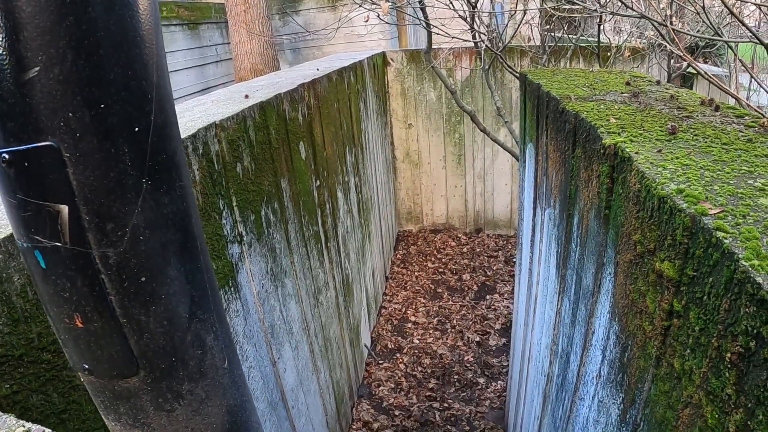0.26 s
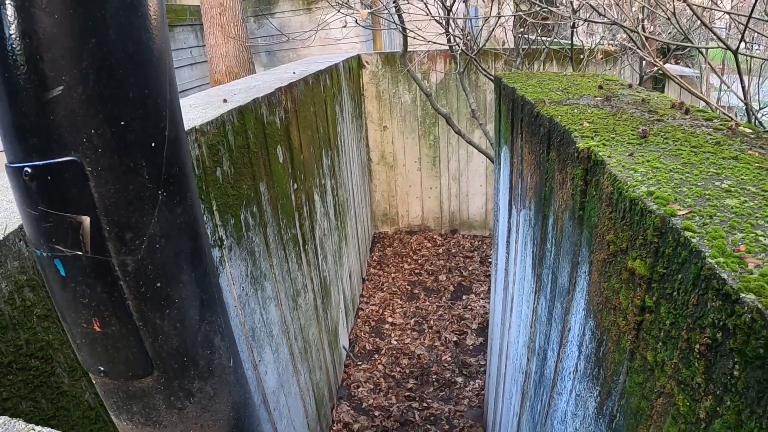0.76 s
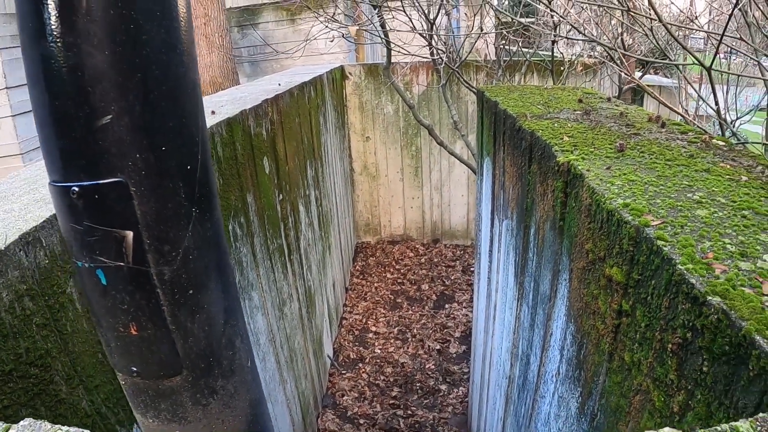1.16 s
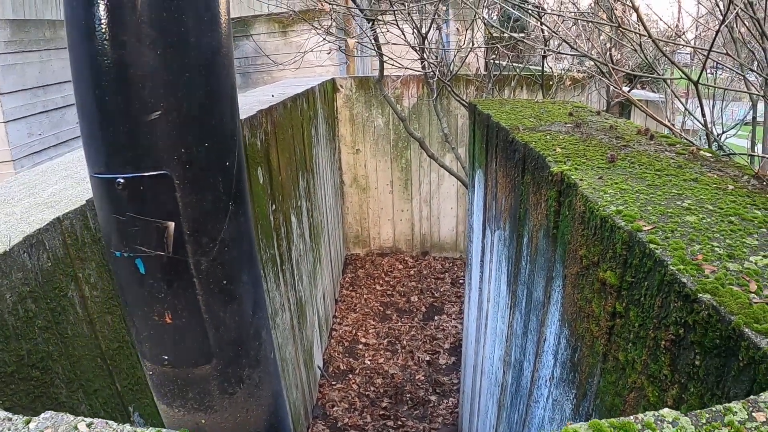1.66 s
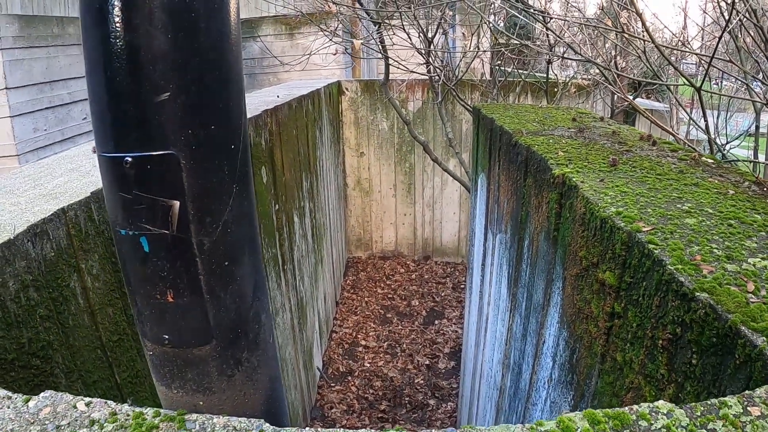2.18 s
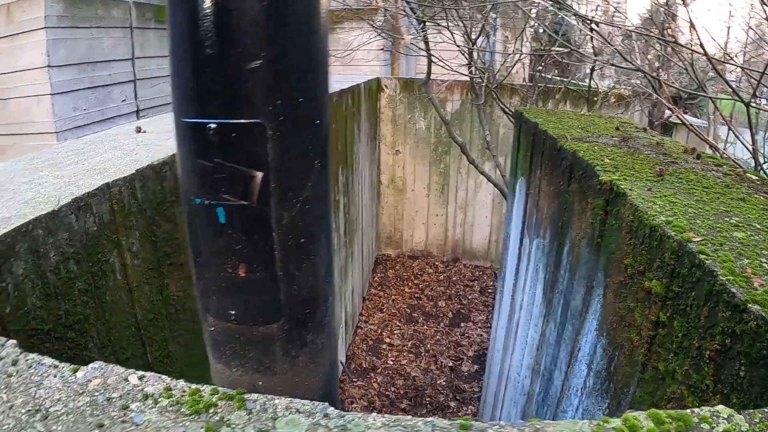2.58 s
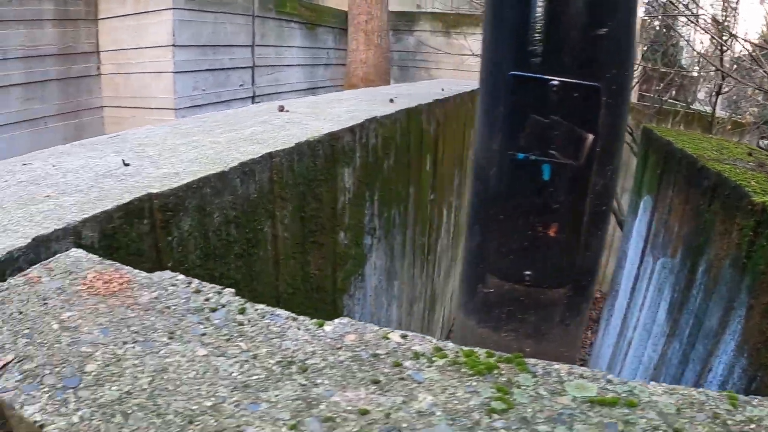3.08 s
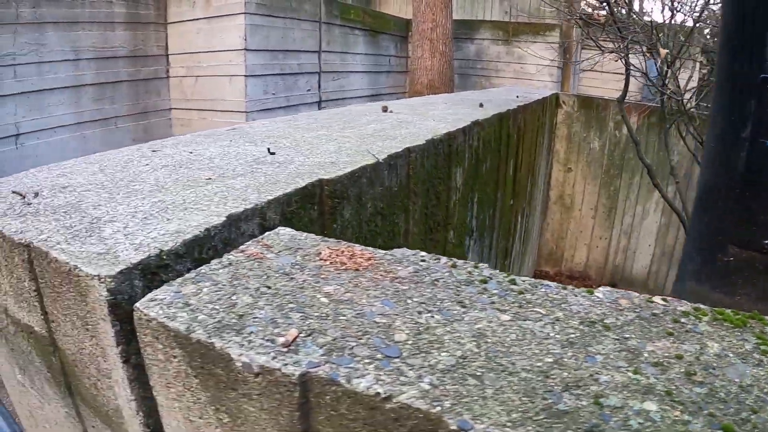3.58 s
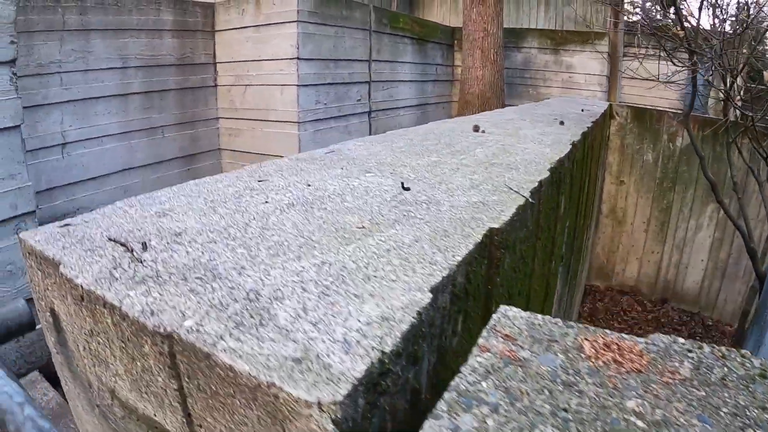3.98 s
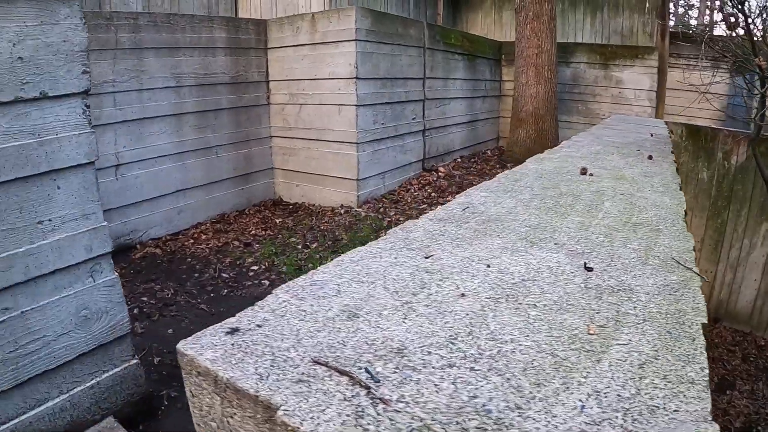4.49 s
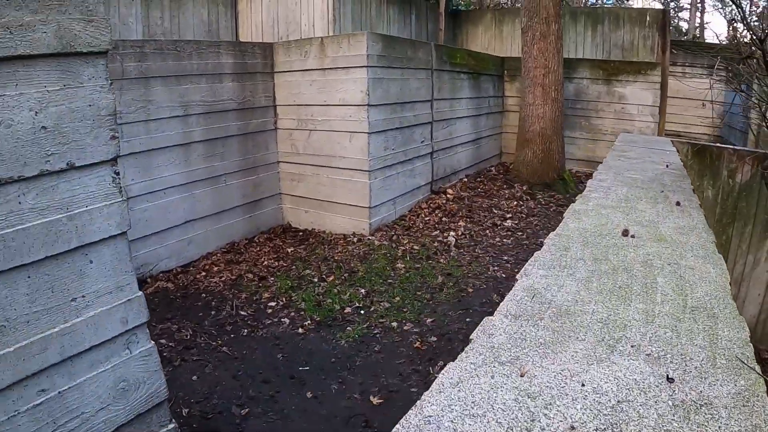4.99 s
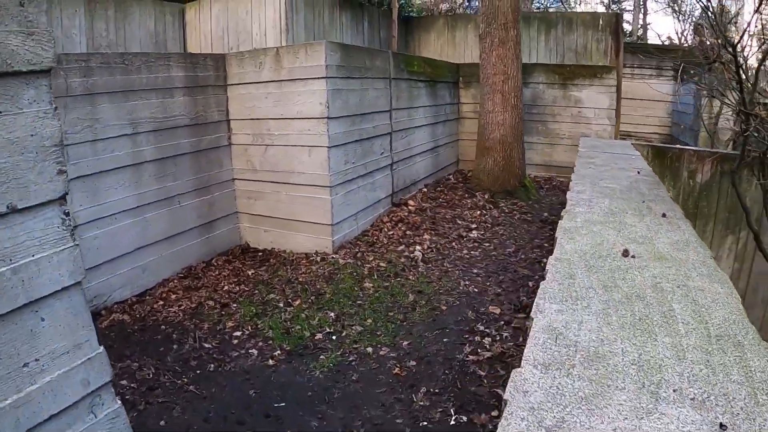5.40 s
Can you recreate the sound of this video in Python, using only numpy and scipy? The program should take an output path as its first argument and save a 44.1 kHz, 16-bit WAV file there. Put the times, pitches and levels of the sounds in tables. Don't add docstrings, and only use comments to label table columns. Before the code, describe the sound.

Deep, steady traffic rumble pulses between concrete walls while birds chirp right then left, and the handheld camera ticks and knocks.

```python
import sys
import numpy as np
from scipy import signal
from scipy.fft import rfft, irfft
from scipy.io import wavfile
from scipy.ndimage import uniform_filter1d

SR = 44100
rng = np.random.default_rng(int(sys.argv[2]) if len(sys.argv) > 2 else 0)


def unload_audio(sound):
    columns = np.transpose(np.atleast_2d(sound))
    steps = np.round(np.clip(columns, -1, 1) * 32767)
    wavfile.write(sys.argv[1], SR, steps.astype(np.int16))


def voltage_ratio(level):
    return 10 ** (np.asarray(level, float) / 20)


N = 249165
T = np.arange(N) / SR
F = np.maximum(np.fft.rfftfreq(N, 1 / SR), 1)


def curve(table):
    s, *columns = np.transpose(table)
    return [np.interp(T, s, column) for column in columns]


def walk(rate):
    hold = max(int(SR / rate), 2)
    steps = np.repeat(rng.standard_normal(N // hold + 1), hold)
    smooth = uniform_filter1d(uniform_filter1d(steps, hold), hold)
    return 1.274 * smooth[:N]


def noise(shape):
    x = irfft(rfft(rng.standard_normal(N)) * shape, N)
    return x / x.std()


def pan(x, db):
    return x * voltage_ratio(np.array([[db], [-db]]) / 2)


def tone(hz, wander_hz, rate):
    cycles = np.cumsum(hz + wander_hz * walk(rate)) / SR
    return 2 * np.pi * (cycles + rng.random())


def bumps(rows, gain):
    total = 0
    for s, size, half in rows:
        reach = np.clip((T - s) / half, -1, 1)
        total = total + gain(size) * np.cos(np.pi / 2 * reach) ** 2
    return total


# t/s, peak level/dB, left minus right level/dB
TICKS = [
    (0.1794, -74, 0.5),
    (0.4194, -77, 1.0),
    (0.4648, -69, 0.0),
    (0.8435, -69, 1.0),
    (1.294, -64, -4.0),
    (3.7294, -68, 1.5),
    (3.9774, -64, -1.5),
    (5.1627, -67, 4.0),
    (5.4236, -66, 9.5),
]


def ticks():
    out, t = np.zeros((2, N)), T[:SR // 20]
    bright = signal.butter(2, [6000, 15000], "band", fs=SR, output="sos")
    for s, db, pan_db in TICKS:
        crack = signal.sosfilt(bright, rng.standard_normal(len(t)) * np.exp(-t / .003))
        i = int(s * SR)
        out[:, i:i + len(t)] += pan(voltage_ratio(db + 5) * crack / np.abs(crack).max(), pan_db)
    return out


# t/s, peak level/dB, f/Hz
KNOCKS = [
    (3.9805, -8, 420),
    (4.699, -13, 330),
]


def knocks():
    out = np.zeros((2, N))
    for s, db, hz in KNOCKS:
        u = (np.pi * hz * (T - s)) ** 2
        out -= voltage_ratio(db) * (1 - 2 * u) * np.exp(-u)
    return out


# t/s, peak level/dB, half length/s
RUSTLES = [
    (1.7, -93, .4),
    (2.9, -91, .4),
    (3.55, -84, .6),
    (3.98, -86, .14),
    (4.55, -90, .3),
    (5.48, -83, .13),
]


def rustle():
    shape = 1 / (1 + (8300 / F) ** 24) / (1 + (F / 9500) ** 3) / (1 + (F / 12700) ** 30)
    level = (voltage_ratio(-96) + bumps(RUSTLES, voltage_ratio)) * voltage_ratio(2.5 * walk(25))
    return level * np.array([noise(shape), noise(shape)])


# t/s, peak level/dB, half length/s
BRUSHES = [
    (5.28, -65, .03),
    (5.47, -58.5, 0.14),
]


def sleeve():
    cloth = 1 / (1 + (4500 / F) ** 4) / (1 + (F / 7200) ** 12)
    level = bumps(BRUSHES, voltage_ratio) * voltage_ratio(2.2 * walk(40))
    return level * np.array([noise(cloth), noise(cloth)])


def bird(glides, arches, pan_db, echo_db, echo_s):
    bow = .12
    notes = []
    for s, length, start_hz, end_hz, db in glides:
        middle_hz = (start_hz + end_hz) / 2 + bow * abs(end_hz - start_hz)
        notes.append((s, length, start_hz, middle_hz, end_hz, db))
    for s, length, foot_hz, top_hz, db in arches:
        notes.append((s, length, foot_hz, top_hz, foot_hz, db))
    song = np.zeros(N)
    for s, length, a_hz, b_hz, c_hz, db in notes:
        count = int(length * SR)
        u = np.arange(count) / count
        hz = a_hz * (1 - u) * (1 - 2 * u) + 4 * b_hz * u * (1 - u) + c_hz * u * (2 * u - 1)
        note = voltage_ratio(db) * np.sqrt(np.sin(np.pi * u)) * np.sin(2 * np.pi * np.cumsum(hz) / SR)
        i = int(s * SR)
        song[i:i + count] += note[:N - i]
    song *= voltage_ratio(2.6 * walk(300))
    t = T[:SR // 4]
    tail = rng.standard_normal((2, len(t))) * np.exp(-np.log(1000) * t / echo_s) * (t > .006)
    echo = signal.fftconvolve(song[None], tail, axes=1)[:, :N]
    return pan(song + voltage_ratio(echo_db) * echo, pan_db)


# t/s, length/s, start f/Hz, end f/Hz, level/dB
RIGHT_BIRD = [
    (.325, 0.049, 4450, 5070, -58.5),
    (.810, .016, 4200, 3260, -48),
    (1.586, .01, 5000, 6670, -43),
    (1.594, .013, 6800, 5780, -48.5),
    (1.674, .012, 4900, 5077, -37.5),
    (1.745, 0.023, 4270, 5070, -50),
    (1.830, 0.03, 4350, 4990, -49),
    (1.915, .012, 4180, 4350, -59.5),
]
# t/s, length/s, start f/Hz, end f/Hz, level/dB
LEFT_BIRD = [(3.352, .024, 4350, 3800, -56), (3.372, .024, 3700, 3700, -50), (3.392, .022, 3950, 4250, -55),
             (3.605, .048, 4250, 3350, -53), (3.655, .035, 3450, 3650, -56), (3.742, .035, 4400, 4650, -53),
             (3.800, .025, 4150, 3900, -53), (3.850, .022, 3450, 3550, -50), (4.718, .035, 4700, 3800, -57),
             (4.948, .045, 4700, 3350, -55), (5.020, .030, 3500, 3750, -51), (5.145, .02, 4650, 4700, -53),
             (5.255, .03, 3600, 3900, -54), (5.295, .03, 4000, 3600, -52), (5.605, .035, 4050, 4200, -53)]


def birds():
    right = bird(RIGHT_BIRD, [(.788, .027, 4500, 4950, -49)], -6, -32.5, echo_s=.13)
    left = bird(LEFT_BIRD, [(4.842, .030, 3750, 4300, -54)], 4, -33, echo_s=.1)
    return right + voltage_ratio(2.5) * left


def shrill(hz, db, width_hz, patchy_db):
    spread = 1 / (1 + (2 * F / width_hz) ** 4)
    carrier = np.exp(1j * tone(hz, 15, 10))
    ports = []
    for _ in range(2):
        level = voltage_ratio(db + patchy_db * walk(14))
        flutter = noise(spread) + 1j * noise(spread)
        ports.append(level * (flutter * carrier).real)
    return np.array(ports)


def whine():
    t = T - 1.55
    attack_db = 238.5 * np.minimum(t, 0)
    release_db = 90 * np.maximum(t - .6, 0)
    return pan(shrill(3375 + 320 * t, -57 + attack_db - release_db, 150, 1.5), 4)


def squeal():
    speed_m_s, nearest_m, passes_s = 12.5, 6., 3.15
    along = speed_m_s * (T - passes_s)
    distance = np.hypot(along, nearest_m)
    hidden_db = -55 * np.maximum(T - 3.35, 0)
    near_db = -59.5 - 44 * np.log10(distance / nearest_m) + hidden_db
    far_db = -73.5 - 10 * (T - 1.1) ** 2
    hz = 7400 * (1 - speed_m_s / 343 * along / distance)
    return shrill(hz, np.maximum(near_db, far_db), 350, 1.6)


# t/s, f/Hz, level/dB
NEAR_LORRY = [(0, 63.6, -10.5), (.25, 63.66, -15.5), (.5, 62.6, -16.5), (.65, 59.3, -14.5),
              (.9, 59.8, -15.5), (1.06, 64.8, -8.5), (1.25, 66.43, -12), (1.5, 67.6, -11.5), (2.4, 68, -11),
              (2.75, 65.4, -10.5), (3.1, 67.2, -10), (3.21, 65, -8), (3.38, 61.4, -12), (3.87, 61.4, -10),
              (4.5, 61.96, -10.5), (4.9, 62.14, -16), (5.37, 62.68, -10), (5.65, 63, -7.5)]
# t/s, depth level/dB, half length/s
NULLS = [(0.082, -10, 0.035), (0.292, -14, .03), (0.382, -11, .05), (0.574, -8, .07), (0.711, -20.5, 0.038),
         (.8, -22, .04), (.92, -9, 0.1), (1.02, -13, 0.021), (1.173, -22, .035), (1.272, -4, 0.035),
         (1.765, -6.5, .06), (1.94, -4.5, .1), (2.47, -2.5, .08), (2.673, -5.5, 0.062), (3.372, -8, .16),
         (3.67, -8.5, 0.072), (3.788, -6, .04), (4.11, -10, .05), (4.553, -7, .06), (4.706, -7, 0.057),
         (4.841, -21, .05), (5.025, -16, 0.11), (5.41, -11, 0.045)]
# t/s, f/Hz
FAR_LORRY = [(0, 130.6), (.7, 133), (1.3, 134.4), (2.3, 137.1), (2.65, 133), (3.2, 133), (3.4, 127.7),
             (4.6, 129.1), (5.1, 127), (5.65, 138.9)]
# t/s, peak level/dB, half length/s
SWELLS = [(0, -17, 0.049), (.5, -27, 0.27), (.84, -18.5, 0.23), (1.05, -20.5, 0.026), (1.24, -19.5, 0.18),
          (1.53, -25, 0.16), (2.03, -24.5, 0.55), (2.65, -18.5, 0.12), (2.93, -21.5, .28), (3.39, -19, .11),
          (3.57, -26.5, 0.066), (3.77, -19.5, .11), (4.14, -20.5, 0.23), (4.33, -20.5, 0.043),
          (4.55, -23.5, 0.25), (5.05, -32.5, .18), (5.64, -23, .05)]


def lorries():
    hz, db = curve(NEAR_LORRY)
    phase = tone(hz, 0.822, 9)
    nulls_db = 0
    for s, depth_db, half in NULLS:
        nulls_db = nulls_db + depth_db * np.clip(1 - np.abs(T - s) / half, 0, 1)
    harmonic = voltage_ratio(-30.5 + 3.8 * walk(9)) * np.sin(3 * phase)
    near = voltage_ratio(db + nulls_db + 0.72 * walk(12)) * (np.sin(phase) + harmonic)
    far_level = (voltage_ratio(-33.5) + bumps(SWELLS, voltage_ratio)) * voltage_ratio(1.5 * walk(16))
    far = far_level * np.sin(tone(curve(FAR_LORRY)[0], 2.2, 12))
    return np.sqrt(2) * (near + far)


# f/Hz, left level/dB per Hz, left minus right level/dB,
# likeness of the ports/0-1, right leads/radians
ROAR = [(14, -60.5, 0.2, 0.86, 0.01), (30, -47, -0.2, 1, 0.01), (63, -38.5, -.3, 1, 0.079),
        (96, -41.5, 0.7, 0.99, 0.039), (208, -49.5, -0.7, 1, 0.11), (467, -56, 2.1, 0.88, 0),
        (993, -51.5, 3, 0.54, 0), (1655, -60, 3, 0.6, 0.61), (2910, -73.5, 5, .54, 0.63),
        (3970, -77.5, 8, 0.1, 0.084), (5220, -88, 3.4, 0.01, 0.18), (7700, -100, 2.5, 0.06, 0.12),
        (8300, -114, 5, 0.4, 0.33), (15170, -138, 0, 0.2, 0.11)]
# t/s, level/dB
FLOW = [(0.05, -26.5), (0.09, -26.5), (0.93, -22), (1.18, -24.5), (2.03, -25), (2.37, -27.5), (2.74, -24.5),
        (2.91, -27.5), (3.99, -24.5), (4.04, -26), (5.27, -24.5), (5.6, -24)]
# f/Hz, share/dB per dB, slow swell of its own level/dB
FOLLOW = [(35, .4, .9), (280, .8, .6), (1100, .95, .25), (3800, .25, .2)]


def roar(flicker_db, shared_db):
    hz, *columns = np.transpose(ROAR)
    db, tilt_db, like, lead = (np.interp(np.log(F), np.log(hz), c) for c in columns)
    like = np.clip(like, 0, 1)
    left, other = rfft(rng.standard_normal((2, N)))
    right = like * np.exp(1j * lead) * left + np.sqrt(1 - like ** 2) * other
    both = np.array([left, right * voltage_ratio(-tilt_db)]) * voltage_ratio(db) * np.sqrt(SR / 2)

    flow_db = curve(FLOW)[0]
    flow_db = flow_db - flow_db.mean()
    flow = np.array([share * flow_db + own_db * walk(4) for _, share, own_db in FOLLOW])
    follow_octave = np.log2(np.array(FOLLOW)[:, 0])
    out, shared = 0, walk(6)
    for centre in np.arange(np.log2(14), np.log2(20000), .5):
        band = np.cos(np.pi / 2 * np.clip((np.log2(F) - centre) * 2, -1, 1)) ** 2
        blend = np.array([np.interp(centre, follow_octave, row) for row in np.eye(4)])
        level_db = blend @ flow + flicker_db * walk(9) + shared_db * shared
        out = out + irfft(both * band, N) * voltage_ratio(level_db)
    return out


def scene():
    camera = ticks() + knocks() + rustle() + sleeve()
    vehicles = whine() + squeal() + lorries()
    return camera + birds() + vehicles + roar(flicker_db=0.43, shared_db=0.46)


def low_pass(x):
    return signal.sosfilt(signal.butter(12, 15700, fs=SR, output="sos"), x)


def record(dry):
    soft = np.tanh(0.67 * dry) / 0.69
    return low_pass(soft)


dry = scene()
out = record(dry)
unload_audio(out)
```